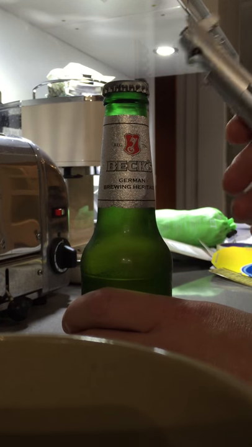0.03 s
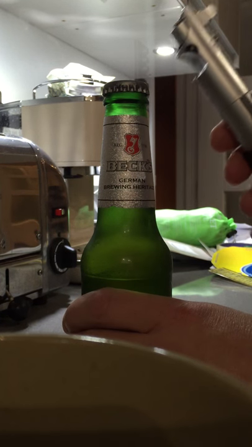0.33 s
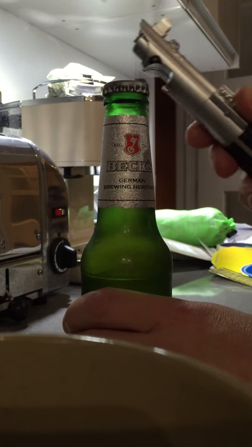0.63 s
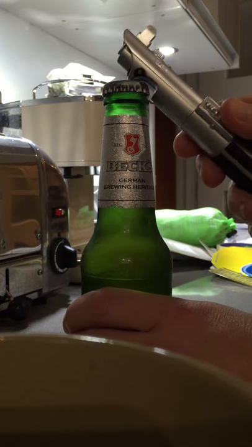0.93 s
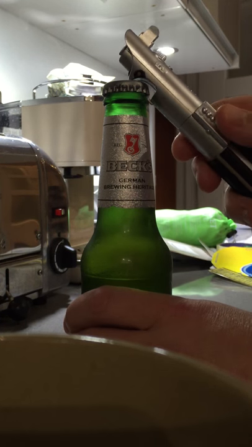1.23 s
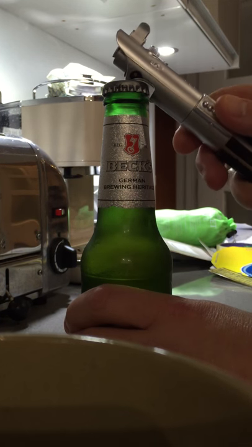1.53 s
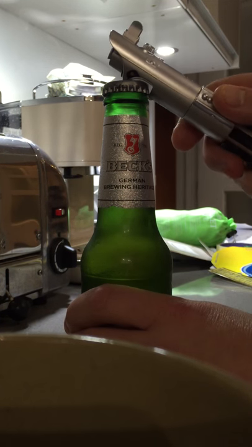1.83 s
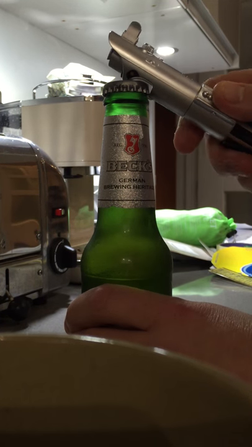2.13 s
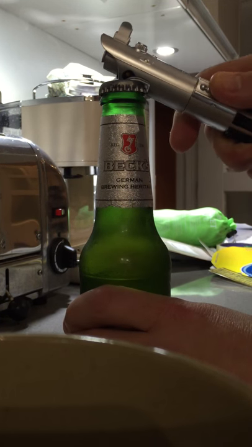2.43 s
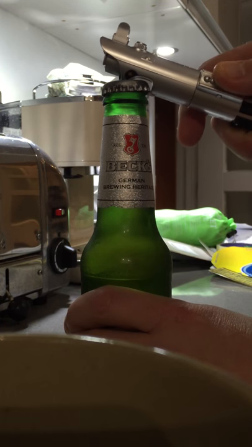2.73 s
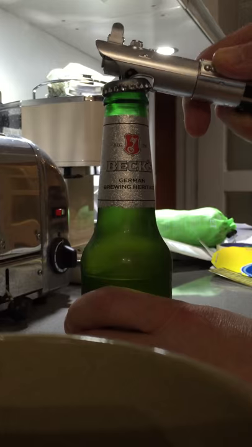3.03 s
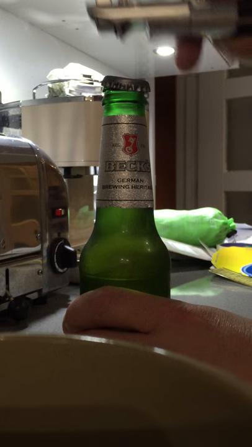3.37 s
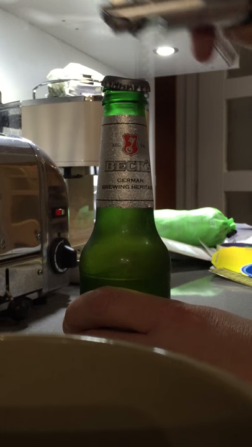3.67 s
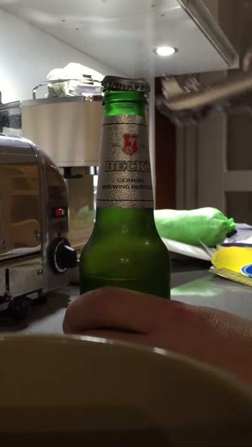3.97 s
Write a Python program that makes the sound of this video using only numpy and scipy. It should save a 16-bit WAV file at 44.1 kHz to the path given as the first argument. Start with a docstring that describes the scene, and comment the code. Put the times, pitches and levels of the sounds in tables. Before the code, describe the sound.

A bottle cap is levered off with a hiss of gas and a sharp pop.

```python
"""Opening a beer bottle

In a quiet kitchen an opener taps a crown cap, exciting the damped modes of steel, glass and worktop.
The seal cracks and turbulent gas hisses through the resonant gap, sinking in pitch as the pressure falls.
The cap slips with a knock, scrapes over the glass lip and lets go with a pop that rings in the room."""
import sys
import numpy as np
from scipy import signal
from scipy.fft import rfft, irfft, next_fast_len
from scipy.io import wavfile
from scipy.ndimage import uniform_filter1d, map_coordinates

SR = 44100
rng = np.random.default_rng(int(sys.argv[2]) if len(sys.argv) > 2 else 0)


def persist_wave(psi):
    """Save psi, clipped to +-1, as 16-bit WAV."""
    counts = np.round(np.clip(psi, -1, 1) * 32767).astype(np.int16)
    wavfile.write(sys.argv[1], SR, np.atleast_2d(counts).T)


N = 176400
T = np.arange(N) / SR

# spectrum of the opening scuff (frequency [Hz], level [dB])
SCUFF_COLOUR = [(150, -20), (300, -7), (560, 0), (1300, -1), (2200, -10), (3000, -27), (6000, -45)]
# taps on the cap (time [s], level [dB], relative tick [dB], relative thud [dB], upper bottle modes [dB])
TAPS = [(1.016, -44, -30, -14, -12), (1.161, -53, -9, -25, 12), (1.502, -56, -14, -6, 2),
        (1.515, -38, -23, -12, 3), (1.826, -54, -20, -15, 8), (1.878, -44, -20, -15, -3),
        (1.906, -54, -21, -12, 2), (3.1682, -17, -9, -12, -3)]
# modes of the held bottle, the bottle on the worktop, the opener (frequency [Hz], level [dB], t60 [s])
BOTTLE_MODES = [(650, 0, .045), (830, -9, .04), (940, -10, .04), (1500, -13, .03), (1820, -17, .025)]
WORKTOP_MODES = [(72, -10, .14), (118, 0, .16), (207, -2, .12), (275, -2, .11), (390, -5, .05)]
OPENER_MODES = [(2650, -9, .03), (3620, 0, .04), (3850, -3, .035), (4600, -10, .025)]
# clinks of the opener (time [s], level [dB])
CLINKS = [(1.161, -52), (1.514, -62), (3.2205, -35)]
# bumps on the worktop (time [s], level [dB], hardness [dB per octave])
BUMPS = [(1.527, -43, -5), (1.566, -41, -7), (2.445, -51, -6), (2.711, -36, 1), (3.171, -35, 2),
         (3.262, -33, 3)]

# resonances of the gap, the hollow under the opener, the cap (frequency [Hz], width [Hz], level [dB])
GAP_MODES = [(1790, 200, -2), (2600, 80, -4), (2865, 60, 0), (3320, 110, 0), (3620, 80, 2), (3900, 110, 1),
             (4500, 180, -2), (5300, 120, -2), (6400, 400, 2), (8450, 200, -1), (9400, 300, -1),
             (11300, 200, 3), (12050, 200, 1)]
HOLLOW_MODES = [(620, 36, 0), (672, 36, -1), (830, 120, -18)]
CAP_MODES = [(1600, 120, 0), (3340, 220, 0), (5220, 150, -7), (6480, 330, 0), (8760, 200, -6),
             (9380, 260, 3), (10250, 180, -6), (11900, 200, -4), (12750, 300, -6), (14200, 500, -9)]
# envelopes of main jet, thin jet at the crimps, low rush, treble fizz, hollow (time [s], level [dB])
MAIN_LEVEL = [(1.955, -34), (1.985, -35), (2.03, -42), (2.075, -33), (2.14, -33), (2.161, -38),
              (2.19, -30.5), (2.33, -29.5), (2.4, -31.5), (2.63, -31.5), (2.7, -35), (2.8, -36.5),
              (3.0, -43), (3.15, -50)]
THIN_LEVEL = [(1.955, -50), (1.98, -35), (2.05, -35), (2.1, -41), (2.26, -39), (2.6, -41), (2.72, -42),
              (2.8, -50), (2.91, -60), (3.15, -66)]
RUSH_LEVEL = [(1.955, -39), (2.02, -46), (2.12, -42), (2.157, -45), (2.217, -38), (2.26, -42), (2.6, -39),
              (2.8, -39), (3.03, -44), (3.15, -51)]
FIZZ_LEVEL = [(1.965, -52), (1.98, -39), (2.05, -41), (2.1, -47), (2.22, -42), (2.6, -46), (2.74, -52),
              (2.91, -63), (3.15, -71)]
HOLLOW_LEVEL = [(1.955, -42), (2.01, -54), (2.14, -58), (2.235, -40), (2.27, -47), (2.43, -40), (2.52, -44),
                (2.66, -42), (2.87, -47), (2.92, -54), (3.15, -61)]
# spectral centres of the two jets (time [s], frequency [Hz])
MAIN_PITCH = [(1.95, 3600), (2.03, 3300), (2.12, 3200), (2.25, 3650), (2.45, 3250), (2.62, 2950),
              (2.8, 2450), (3.0, 2050), (3.16, 1950)]
THIN_PITCH = [(1.95, 5300), (1.98, 5600), (2.04, 6250), (2.11, 6700), (2.17, 5700), (2.7, 5800)]
# source spectra of the gas noises, ahead of the gap (frequency [Hz], level [dB])
MAIN_COLOUR = [(500, -34), (800, -14), (1300, -4), (2000, 0), (4400, 0), (4900, -7), (7000, -10),
               (8000, -30)]
THIN_COLOUR = [(3000, -30), (4600, 0), (6800, 0), (7300, -15), (8000, -30)]
RUSH_COLOUR = [(450, -30), (620, -7), (900, -3), (1300, -2), (1900, 0), (2200, -8), (3000, -25),
               (5000, -45)]
FIZZ_COLOUR = [(6500, -30), (7400, -13), (8000, -19), (8450, 0), (9700, 0), (10500, -9), (11200, -4),
               (12100, -4), (13300, -23), (15000, -28)]
SPURT_COLOUR = [(2000, -28), (5000, -12), (6600, -8), (7600, -3), (8500, 0), (9400, 0), (10500, -5),
                (11800, -3), (13500, -1), (15000, 0)]

# the cap's teeth on the lip, the last tearing free (start [s], rise [s], hold [s], t60 [s], level [dB])
SCRAPES = [(3.219, .002, .002, .04, -31), (3.229, .002, .003, .05, -30), (3.2395, .004, .001, .04, -22),
           (3.251, .004, .005, .016, -11)]
# spectrum of steel crunching on glass (frequency [Hz], level [dB])
CRUNCH_COLOUR = [(200, -12), (900, 2), (2700, 2), (4500, -4), (7000, -2), (13000, 0), (15500, -3)]
# partials of the pop (frequency [Hz], level [dB])
POP_TONES = [(330, -22), (645, 0), (860, -10), (1420, -16), (1605, -13)]

# reverberation time of the kitchen (frequency [Hz], t60 [s])
ROOM_T60 = [(100, .4), (800, .52), (3000, .46), (7000, .44), (10000, .35), (15000, .25)]
# spectra of the room's response and of its still air (frequency [Hz], level [dB])
ROOM_COLOUR = [(100, 1), (300, 3), (640, -7), (860, 3), (1150, -2), (1500, 4), (2400, 0), (3400, 2),
               (4800, -6), (6600, 1), (10000, -3), (15000, -7)]
AIR_COLOUR = [(25, -14), (60, -3), (95, -7), (130, -1), (230, -4), (290, -9), (354, -3), (430, -13),
              (560, -14), (770, -20), (1200, -20), (2500, -23.5), (5000, -27), (10000, -31), (15000, -33)]


def amp(db):
    """Amplitude ratio: tenfold for every 20 dB."""
    return 10 ** (np.asarray(db) / 20)


def unit(x):
    """Normalisation to an rms of 1."""
    return x / np.sqrt(np.mean(x ** 2) + 1e-20)


def decay(t, t60):
    """Exponential damping: a fall of 60 dB in t60 seconds."""
    return np.exp(-np.log(1000) * t / t60)


def along(points, hz):
    """Interpolation on a logarithmic frequency axis."""
    f, values = np.transpose(points)
    return np.interp(np.log(hz + 1), np.log(f + 1), values)


def curve(points, t=T):
    """Linear interpolation in time."""
    return np.interp(t, *np.transpose(points))


def filtered(x, response):
    """Linear filtering: the spectrum is multiplied by a frequency response."""
    size = next_fast_len(N + SR // 2)
    return irfft(rfft(x, size) * response(np.fft.rfftfreq(size, 1 / SR)), size)[:N]


def noise(colour):
    """Spectral shaping of white noise, at rms 1."""
    return unit(filtered(rng.standard_normal(N), lambda f: amp(along(colour, f))))


def resonant_noise(modes, order=1):
    """Forced vibration: noise drives resonators whose powers add, at rms 1."""
    def response(f):
        powers = (amp(2 * db) * abs(f * width / (hz * hz - f * f + 1j * f * width)) ** (2 * order)
                  for hz, width, db in modes)
        return np.sqrt(sum(powers))
    return unit(filtered(rng.standard_normal(N), response))


def swell(start, rise, hold, t60, db):
    """Amplitude envelope: smooth rise, hold and exponential decay, all timed in seconds."""
    onset = np.sin(np.pi / 2 * np.clip((T - start) / rise, 0, 1)) ** 2
    return onset * amp(db) * decay(np.maximum(T - start - rise - hold, 0), t60)


def ring(start, modes, attack_s):
    """Free vibration: damped modes whose level and tuning vary a little from blow to blow."""
    t = np.maximum(T[:SR // 2] - start % (1 / SR), 0)
    scatter = rng.standard_normal((len(modes), 2))
    tone = sum(amp(db + 1.5 * louder) * decay(t, t60) * np.sin(2 * np.pi * hz * (1 + .015 * sharper) * t)
               for (hz, db, t60), (louder, sharper) in zip(modes, scatter))
    return np.pad(tone * (1 - np.exp(-t / attack_s)), (int(start * SR), N))[:N]


def scuff():
    """Friction noise: a soft scuff before the work begins."""
    return swell(start=.674, rise=.016, hold=.02, t60=.2, db=-49) * noise(SCUFF_COLOUR)


def cap_noise():
    """Frictional excitation: steel grinding on glass sounds the cap's resonances over a broad crunch."""
    return unit(resonant_noise(CAP_MODES) + amp(-3) * noise(CRUNCH_COLOUR))


def opener_taps():
    """Impact excitation: each tap rings the bottle, thuds on the worktop and ticks on the cap."""
    metal = cap_noise()
    out = np.zeros(N)
    for start, db, tick_db, thud_db, upper_db in TAPS:
        lowest = ring(start, BOTTLE_MODES[:1], attack_s=.0008)
        upper = amp(upper_db) * ring(start, BOTTLE_MODES[1:], attack_s=.0008)
        thud = amp(thud_db) * ring(start, WORKTOP_MODES, attack_s=.001)
        tick = metal * swell(start - .0005, rise=.0005, hold=.0005, t60=.014, db=tick_db)
        out += amp(db) * (lowest + upper + thud + tick)
    return out


def opener_clinks():
    """Modal ringing: the steel opener vibrates briefly after striking the cap."""
    return sum(amp(db) * ring(start, OPENER_MODES, attack_s=.001) for start, db in CLINKS)


def worktop_bumps():
    """Contact hardness: the harder the bottle meets the worktop, the stronger the upper modes."""
    pivot_hz = WORKTOP_MODES[1][0]
    out = np.zeros(N)
    for start, db, hardness in BUMPS:
        modes = [(hz, level + hardness * np.log2(hz / pivot_hz), t60) for hz, level, t60 in WORKTOP_MODES]
        out += amp(db) * ring(start, modes, attack_s=.005)
    return out


def gap_gain(hz, floor_db=-6):
    """Resonance: the gap under the cap raises sharp peaks above a flat response."""
    peaks = sum(amp(2 * db) / (1 + (2 * (hz - centre) / width) ** 2) for centre, width, db in GAP_MODES)
    return np.sqrt(amp(2 * floor_db) + peaks)


def gas(colour):
    """Source and filter: flow noise passes through the gap, at rms 1."""
    return unit(filtered(noise(colour), gap_gain))


def jet(pitch, colour, width_oct, skirt_db):
    """Turbulent jet noise: a spectral hump follows a pitch curve, at rms 1."""
    hz, t, spectrum = signal.stft(gas(colour), SR, nperseg=512)
    octaves = np.log2((hz[:, None] + 1) / curve(pitch, t))
    hump = np.exp(-.5 * (octaves / width_oct) ** 2) + amp(skirt_db)
    gas_gain = gap_gain(hz) * amp(along(colour, hz))
    hump /= np.linalg.norm(hump * gas_gain[:, None], axis=0)  # even power as the hump moves
    return unit(signal.istft(spectrum * hump, SR, nperseg=512)[1][:N])


def hiss():
    """Turbulence: gas escapes and sounds the hollows around the cap until it is spent."""
    main = jet(MAIN_PITCH, MAIN_COLOUR, width_oct=.28, skirt_db=-17) * amp(curve(MAIN_LEVEL) - .8)
    thin = jet(THIN_PITCH, THIN_COLOUR, width_oct=.16, skirt_db=-20) * amp(curve(THIN_LEVEL) - .5)
    rush = gas(RUSH_COLOUR) * amp(curve(RUSH_LEVEL) - 1)
    fizz = gas(FIZZ_COLOUR) * amp(curve(FIZZ_LEVEL))
    # a spurt as the gap widens
    spurt = gas(SPURT_COLOUR) * swell(start=2.612, rise=.066, hold=.034, t60=.055, db=-24.5)
    hollow = resonant_noise(HOLLOW_MODES, order=2) * amp(curve(HOLLOW_LEVEL) - 2)
    opens_s, spent_s, flutter_db = 1.9495, 3.17, .4
    seal = swell(opens_s, rise=.002, hold=spent_s - opens_s, t60=.06, db=0)
    flutter = amp(flutter_db * unit(uniform_filter1d(rng.standard_normal(N), size=300)))
    return seal * flutter * (main + thin + rush + fizz + spurt + hollow + whistle())


def neck_hum(hz=220, width_hz=70):
    """Cavity resonance: the air in the neck hums."""
    envelope = swell(start=2.15, rise=.04, hold=.03, t60=.8, db=-52)
    return envelope * resonant_noise([(hz, width_hz, 0)], order=2)


def whistle(waver_depth=.02, waver_s=.012):
    """Edge tone: a faint, unsteady whistle rides at the centre of the main jet."""
    knots = T / waver_s
    waver = map_coordinates(rng.standard_normal(int(knots[-1]) + 4), [knots])
    flicker_db = 3 * map_coordinates(rng.standard_normal(int(knots[-1]) + 4), [knots])
    hz = curve(MAIN_PITCH) * (1 + waver_depth * waver)
    envelope = swell(start=2.19, rise=.06, hold=.09, t60=1.6, db=-38)
    return envelope * amp(flicker_db) * np.sin(2 * np.pi * np.cumsum(hz) / SR)


def cap_scrapes():
    """Sliding friction: the cap's teeth grind over the glass lip in short bursts."""
    return cap_noise() * sum(swell(*scrape) for scrape in SCRAPES)


def pop(start=3.253):
    """Sudden pressure release: the cap flies open with hollow, heavily damped tones."""
    tones = sum(amp(db) * np.sin(2 * np.pi * hz * (T - start)) for hz, db in POP_TONES)
    return swell(start, rise=.0025, hold=.0065, t60=.021, db=-6.5) * tones


def kitchen(x, tail_db=-13, walls_db=-15, delay_s=.005):
    """Reverberation: near surfaces reflect first; the room rings on, longest in the middle range."""
    hz, t, spectrum = signal.stft(rng.standard_normal(SR), SR, nperseg=256)
    tail = signal.istft(spectrum * decay(t, along(ROOM_T60, hz)[:, None]), SR, nperseg=256)[1]
    walls = rng.standard_normal(len(tail)) * decay(T[:len(tail)], t60=.07)
    response = amp(tail_db) * tail / np.linalg.norm(tail) + amp(walls_db) * walls / np.linalg.norm(walls)
    reflected = signal.fftconvolve(x, np.pad(response, (int(delay_s * SR), 0)))[:N]
    return filtered(reflected, lambda f: amp(along(ROOM_COLOUR, f)))


def scene():
    """Superposition of the direct sound, its reverberation and the room's still air."""
    handling = scuff() + opener_taps() + opener_clinks() + worktop_bumps()
    direct = handling + hiss() + neck_hum() + cap_scrapes() + pop()
    return (direct + kitchen(direct) + amp(-64.5) * noise(AIR_COLOUR))[None]


def record(dry):
    """Band limiting and clipping: deep bass is shed, peaks stop at full scale, the top treble is cut."""
    low_cut_hz, top_hz, edge_hz = 70, 15330, 400
    x = signal.sosfilt(signal.butter(2, low_cut_hz, "high", fs=SR, output="sos"), dry[0])
    return filtered(np.clip(x, -1, 1), lambda f: np.clip((top_hz - f) / edge_hz + .5, 0, 1))[None]


dry = scene()
out = record(dry)
persist_wave(out)
```